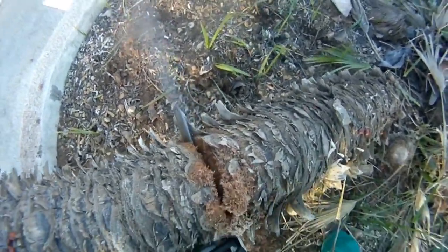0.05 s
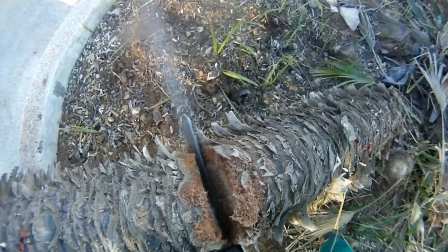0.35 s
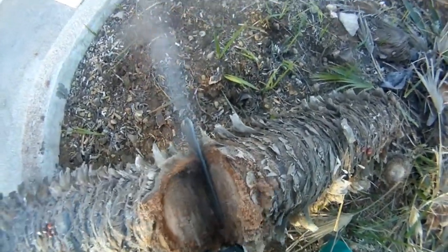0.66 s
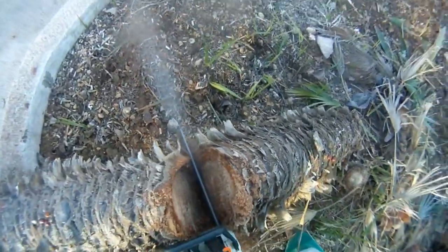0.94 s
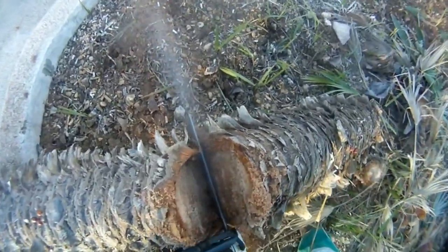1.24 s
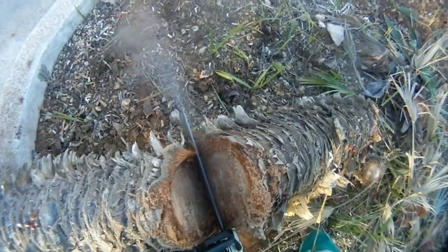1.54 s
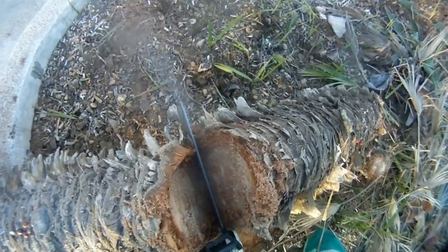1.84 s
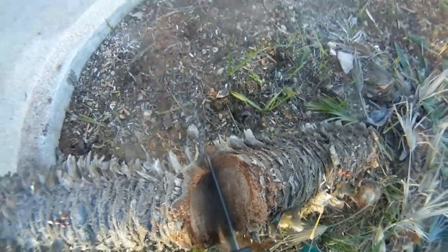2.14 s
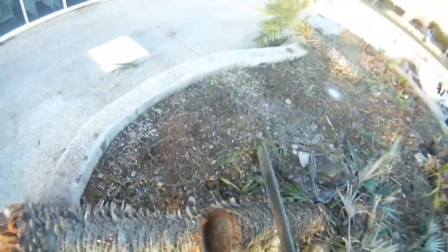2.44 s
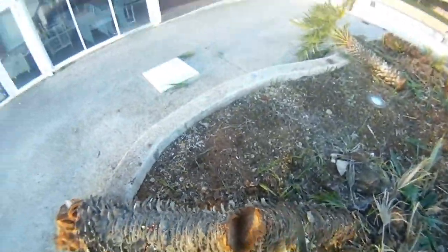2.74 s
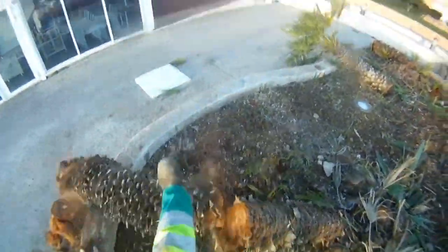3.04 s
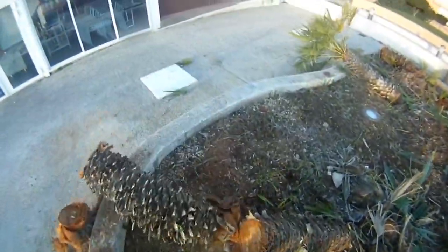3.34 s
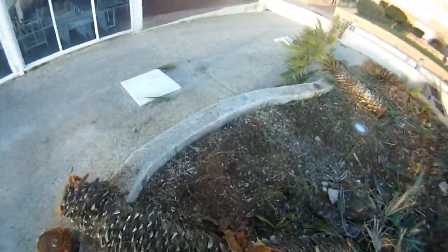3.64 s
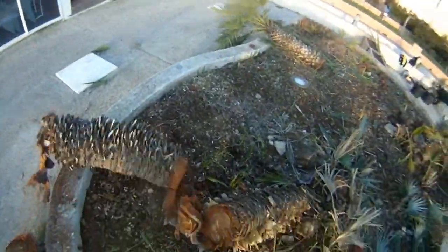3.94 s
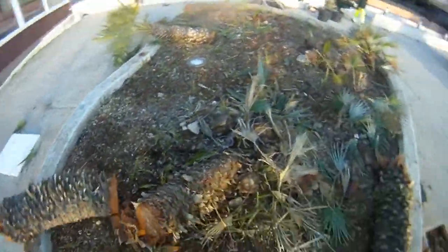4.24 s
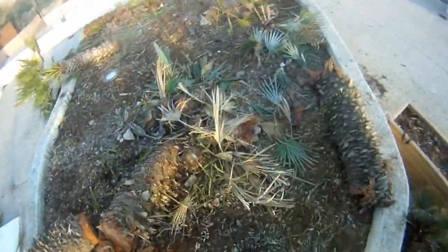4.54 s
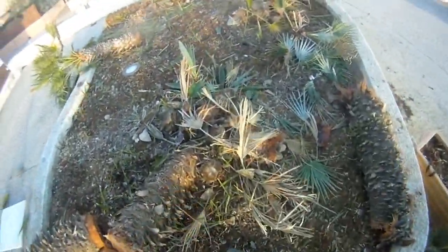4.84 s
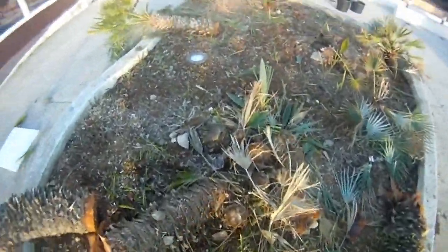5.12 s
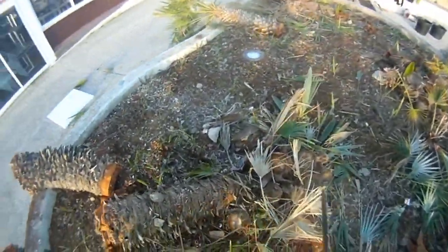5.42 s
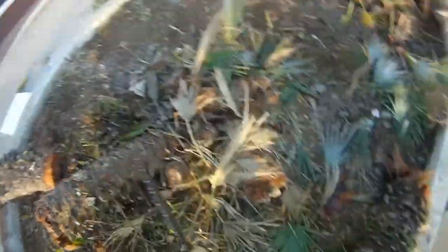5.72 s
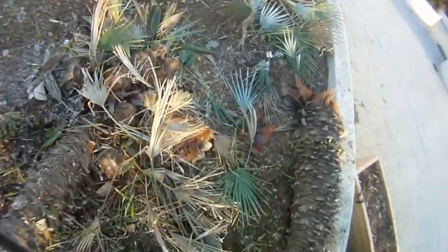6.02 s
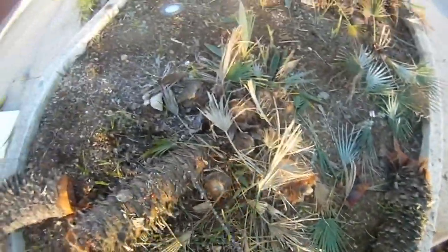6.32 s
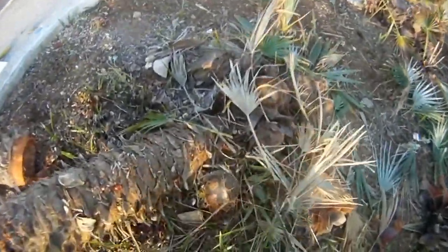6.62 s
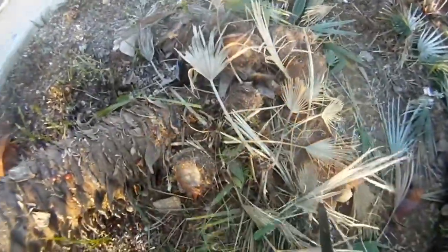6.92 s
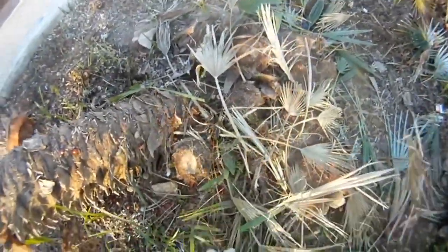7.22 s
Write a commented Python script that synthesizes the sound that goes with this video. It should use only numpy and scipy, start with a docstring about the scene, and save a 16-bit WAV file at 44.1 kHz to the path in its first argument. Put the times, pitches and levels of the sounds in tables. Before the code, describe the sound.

A chainsaw labours through a palm trunk, bogs down, then drops to an uneven idle as the cut log thumps softly.

```python
"""A two-stroke chainsaw, heard from a camera on its user, labours through a fibrous palm trunk, bogs down
and is let off. It runs down to a hunting idle, at times firing raggedly, while the cut log is kicked
away and rolls on the soil. Periodic firing excites the muffler at harmonics of the crankshaft speed;
piston, chain and cutters add noise by impact and friction. Air rumbles faintly."""
import sys
import numpy as np
from scipy import signal
from scipy.fft import rfft, irfft
from scipy.io import wavfile
from scipy.ndimage import uniform_filter1d

SR = 44100
rng = np.random.default_rng(int(sys.argv[2]) if len(sys.argv) > 2 else 0)


def pcm_store(signal):
    """Save signal as 16-bit PCM."""
    levels = np.round(np.clip(np.atleast_2d(signal), -1, 1) * 32767)
    wavfile.write(sys.argv[1], SR, levels.astype(np.int16).T)


N = 325017
TIME = np.arange(N) / SR
FULL_HZ, IDLE_HZ = 180, 45  # reference crankshaft speeds
THROTTLE_OFF_S, RUN_DOWN_S = 2.135, .165
FLAT = [(1000, 0)]  # uniform response: frequency_hz, gain_db

# crankshaft speed in the cut and at idle: time_s, speed_hz
CUT_SPEED = [(0.0, 177.8), (0.13, 174.1), (0.37, 192.4), (0.54, 189.3), (0.86, 200.1), (0.96, 196.4),
             (1.06, 198), (1.13, 188.6), (1.25, 185.2), (1.33, 175), (1.45, 150.4), (1.67, 155.6),
             (1.9, 147.9), (2.03, 132.7), (2.09, 135.3), (2.13, 144.2)]
IDLE_SPEED = [(2.7, 51.6), (3.02, 38.05), (3.49, 46.16), (3.62, 51.65), (3.78, 53.63), (4.21, 53.3),
              (4.52, 44.14), (4.72, 51.1), (5.07, 58.7), (5.38, 59.1), (5.74, 46.4), (5.93, 48.78),
              (6.32, 41.66), (6.76, 49.7), (7.02, 41.1), (7.37, 45.2)]
def crankshaft():
    """Rotational inertia: off the throttle, the speed relaxes exponentially to the hunting idle."""
    cut = np.interp(TIME, *np.transpose(CUT_SPEED))
    idle = np.interp(TIME, *np.transpose(IDLE_SPEED))
    return idle + (cut - idle) * np.exp(-np.maximum(TIME - THROTTLE_OFF_S, 0) / RUN_DOWN_S)

# exhaust harmonics at FULL_HZ: order, relative_db, growth_db_per_octave
FIRING = [(1, 2, 1.5), (2, 4, 25), (3, 1.5, 2.5), (4, -1.5, 3), (5, -8, -2.5), (6, -3.5, 0), (7, -7, -5.5)]
# muffler resonances and hollows under load: centre_hz, width_hz, gain_db
PIPE = [(400, 10, 3.5), (582, 240, 2.5), (592.2, 11.4, -10.5), (764.3, 18.4, -29), (1180, 25, 11.5),
        (1430, 230, -10)]
def loaded_exhaust(turns, octaves):
    """Source and filter: firing harmonics slide across the muffler's fixed resonances."""
    orders = [(k, db + growth_db * octaves) for k, db, growth_db in FIRING]
    return undb(-27) * colour(tones(turns, orders, flutter_db=.5), FLAT, PIPE)

# sprocket harmonics: order, relative_db
SPROCKET = [(6, -5), (9, 1.5), (12, -.5), (15, -9), (18, -19), (21, -16.5)]
# resonances and a hollow of the sprocket cover: centre_hz, width_hz, gain_db
COVER = [(1300, 200, 7), (1417, 110, -12), (1600, 130, 5), (2090, 50, 5.5), (2298, 260, 6),
         (2730, 105, 9.5), (3674, 130, 11)]
# the sprocket's whine swells briefly: start_s, length_s, rise_db
SQUEALS = [(-.1, 0.478, 6), (.42, 0.26, 1.5), (.84, .14, 5.5), (1.21, .19, 4), (1.85, .2, 0.5)]
def sprocket_whine(turns):
    """Resonance: each sprocket harmonic flares as it crosses a mode of the cover."""
    whine = colour(tones(turns + .0046 * walk(45.1), SPROCKET, flutter_db=3), FLAT, COVER)
    return undb(-27.5 + spells(SQUEALS, edge_s=.057)) * whine

# drive links meeting the sprocket: order, relative_db
MESH = [(5, 3), (6, 2), (8, -2.5), (10, 0.5), (11, -1.5), (13, 3.5), (15, 1), (16, -1.5), (18, 6.5),
        (21, -16)]
# resonances and hollows of the guide bar: centre_hz, width_hz, gain_db
BAR = [(1180, 210, 1), (1606, 150, 9), (2460, 89, -5.5), (2725, 37, 7), (3410, 420, -25), (3500, 180, -9)]
# peaks and hollows of the camera's microphone, on saw and bark alike: centre_hz, width_hz, gain_db
MIC_COLOUR = [(1244, 155, 5.5), (1414, 239, -14), (2327, 230, 3.5), (3300, 203, -13.5), (3690, 140, 3),
              (4287, 1190, -9.5), (5300, 340, 2), (5640, 150, 2.5), (5970, 650, -6)]
# spectra of the loaded machine and of the chain sliding in its groove: frequency_hz, gain_db
LOADED = [(100, -33), (400, -21), (700, -23), (1100, -5.5), (1700, 0.5), (2800, -5.5), (4200, -7.5),
          (6000, -16.5)]
SLIDE = [(300, -17.5), (1000, 2), (3000, 11), (4500, 6), (6000, 2.5)]
# the cutters bite into the trunk: start_s, length_s, rise_db
BITES = [(.36, .58, 11), (.94, 0.26, 6.5), (1.18, 0.17, 11), (1.37, 0.84, 9)]
def cutting(turns, octaves):
    """Forced vibration: chain links drive the bar, while the piston knocks and cutters tear fibre."""
    snatching_turns = turns + .008 * walk(59.8)
    whine = colour(tones(snatching_turns, MESH, flutter_db=4), FLAT, BAR)
    knock = colour(ring(pulses(turns, scatter_db=2), decay_s=.0056), LOADED, MIC_COLOUR)
    links = 3 * turns
    tearing = colour(rattle(links, depth=.087, grain_db=.5), LOADED, MIC_COLOUR)
    rasp = colour(rattle(turns, depth=.023, grain_db=.5), SLIDE, MIC_COLOUR)
    clatter = undb(-5) * whine + undb(-1.5) * knock + undb(-2 + .27 * walk(15)) * tearing
    rasp_db = -33.5 + spells(BITES, edge_s=.16) + walk(21.863)
    return undb(-22 + 2.5 * octaves) * clatter + undb(rasp_db) * rasp

# exhaust harmonics at idle: order, relative_db
PUTTER = [(2, -15), (3, -13.5), (4, -1), (5, -4), (6, -27), (7, -8), (8, -9), (9, -12.5), (11, -14)]
# muffler resonances and a hollow at idle: centre_hz, width_hz, gain_db
BOOM = [(167, 50, -2), (237, 120, 6.5), (470, 192, 4)]
# muffler's noise spectrum at idle: frequency_hz, gain_db
MUFFLER = [(60, -35), (130, -14.5), (225, 2.5), (330, -1.5), (480, -12), (1200, -30.5), (4000, -78)]
# ragged firing: start_s, length_s, putter_rise_db, burble_rise_db
RAGGED = [(2.0, 0.44, 5, 2), (2.2, 0.65, 4, 7.5), (5.55, 1, 7.5, 12), (6.68, 0.35, 7, 5)]
def idle_exhaust(turns, octaves):
    """Acoustic filtering: the muffler shapes uneven firing into a tonal putter and a noisy burble."""
    putter_db, burble_db = spells(RAGGED, edge_s=.34) + 4.5 * octaves
    putter = colour(tones(turns + .011 * walk(25), PUTTER, flutter_db=1.5), FLAT, BOOM)
    burble = colour(rattle(turns, depth=.24, grain_db=1), MUFFLER)
    return undb(-54 + putter_db) * putter + undb(-60 + burble_db) * burble

# spectrum of the idling machine: frequency_hz, gain_db
COASTING = [(100, -19.5), (700, -13.5), (1100, -10.5), (1900, 0.5), (2800, -11), (4200, -13), (6000, -26.5)]
# modes of the loose clutch and chain: centre_hz, width_hz, gain_db
CLUTCH = [(1294, 86, 7), (2010, 94, 2.5), (3510, 93, 3.5), (4930, 200, 7)]
# the clutch catches; the chain creeps round the bar: start_s, length_s, rise_db
CATCHES = [(5.22, 0.37, 1.5), (5.9, .22, 2), (6.36, .24, 6.5), (6.78, .42, 6.5)]
CREEPS = [(2.05, 0.75, 16), (5.36, 1.08, 14), (6.62, 0.31, 14), (7.22, .3, 15.5)]
def clutch_and_chain(turns, octaves):
    """Impact and friction: the loose clutch rattles and the sliding chain hisses."""
    bells = list(MIC_COLOUR) + list(CLUTCH)
    clutch = colour(rattle(turns, depth=.15, grain_db=1) * undb(.97 * walk(28)), COASTING, bells)
    chain = colour(rattle(turns, depth=.047, grain_db=2), SLIDE, bells)
    clutch_db = -44 + spells(CATCHES, edge_s=.15) + 10 * octaves
    chain_db = -59.5 + spells(CREEPS, edge_s=.26) + 8 * octaves
    return undb(clutch_db) * clutch + undb(chain_db) * chain

# the shaking reaches the camera more strongly: start_s, length_s, rise_db
SHAKES = [(3.7, 0.58, 6), (4.6, 0.75, 8)]
def shake(turns, octaves):
    """Vibration transmission: the idling saw shakes the camera once a turn."""
    return undb(-56 + spells(SHAKES, edge_s=.13) + 5 * octaves) * unit(np.sin(2 * np.pi * turns))

# bark and dry fibre crunching: start_s, level_db, centre_hz, span_s
CRUNCHES = [(2.21, -29, 1956, .03), (2.622, -32, 1678, 0.014), (2.959, -35.5, 1970, 0.014),
            (3.014, -39, 1231, 0.023), (3.099, -38, 1220, 0.022), (3.661, -50, 3580, 0.016),
            (5.88, -44, 3005, 0.11), (6.757, -42.5, 2424, .025)]
# thumps of boot, log and handling: start_s, level_db, pitch_hz, decay_s
THUMPS = [(2.968, -26, 32.4, 0.047), (3.039, -32, 44.7, 0.033), (3.661, -28.5, 36, 0.035),
          (3.82, -35, 45.4, .06), (6.03, -46.5, 38.3, 0.026), (6.805, -33, 39.6, 0.025)]
def log_moving():
    """Transient excitation: crushed fibres give noise bursts, heavy blows give damped sinusoids."""
    out = np.zeros(N)
    for start_s, db, hz, span_s in CRUNCHES:
        age = 2 * np.maximum(TIME - start_s, 0) / span_s  # the burst peaks at age 1
        spectrum = [(hz / 4, -24), (hz, 0), (hz * .92, -1), (hz * 2.1, -14), (hz * 6, -25)]
        fibres = colour(rng.standard_normal(N) * undb(1.35 * walk(700)), spectrum, MIC_COLOUR)
        out += undb(db) * fibres * age * np.exp(1 - age)
    for start_s, db, hz, decay_s in THUMPS:
        age_s = np.maximum(TIME - start_s, 0)
        out += undb(db) * np.sin(2 * np.pi * hz * age_s) * np.exp(-age_s / decay_s)
    return out

def breeze():
    """Turbulence: moving air makes a low, wavering rumble on the camera."""
    spectrum = [(8, .5), (25, 4), (50, 6), (90, -16), (2000, -96)]
    return undb(-53.5 + 3.1 * walk(9.2)) * colour(rng.standard_normal(N), spectrum)

def tones(turns, orders, flutter_db):
    """Harmonic series: partials locked to the crankshaft, each fluttering on its own."""
    return unit(sum(undb(db + flutter_db * walk(12)) * np.sin(2 * np.pi * (k * turns + rng.random()))
                    for k, db in orders))

def pulses(turns, scatter_db):
    """Impulse train: a click of random size each turn, with equal power at any speed."""
    at = np.flatnonzero(np.diff(np.floor(turns)) > 0)
    step = turns[at + 1] - turns[at]
    early = turns[at + 1] % 1 / step  # share of the click in the earlier sample
    size = undb(scatter_db * rng.standard_normal(len(at))) / np.sqrt(step)
    out = np.zeros(N)
    out[at] += size * early
    out[at + 1] += size * (1 - early)
    return unit(out)

def rattle(turns, depth, grain_db):
    """Amplitude modulation: grainy noise swells once a cycle."""
    swell = np.exp(depth * np.cos(2 * np.pi * turns))
    return unit(rng.standard_normal(N) * swell * undb(grain_db * walk(900)))

def ring(x, decay_s, size=2048):
    """Modal overlap: countless small casing modes smear each blow into decaying noise."""
    return signal.oaconvolve(x, rng.standard_normal(size) * np.exp(-TIME[:size] / decay_s))[:N]

def colour(x, points, bells=(), size=8192):
    """Minimum-phase filtering: a broad spectrum with bell-shaped peaks and hollows; unit RMS out."""
    f = np.maximum(np.fft.rfftfreq(size, 1 / SR), 1)
    hz, db = np.transpose(points)
    db = np.interp(np.log(f), np.log(hz), db)
    for centre, width, gain in bells:
        db = db + gain * .5 ** ((2 * (f - centre) / width) ** 2)
    cepstrum = irfft(np.log(undb(db)))
    cepstrum[1:size // 2] *= 2
    cepstrum[size // 2 + 1:] = 0
    response = irfft(np.exp(rfft(cepstrum)))
    return unit(signal.oaconvolve(x, response)[:N])

def spells(table, edge_s):
    """Trapezoidal envelopes: each row's rise fades in, holds and fades out; overlaps add."""
    start, length, *rises = np.transpose(table)
    inside_s = np.minimum(TIME - start[:, None], (start + length)[:, None] - TIME)
    return np.squeeze(np.array(rises) @ np.clip(.5 + inside_s / edge_s, 0, 1))

def walk(rate_hz):
    """Smooth random fluctuation of unit RMS."""
    k = int(SR / rate_hz)
    return unit(uniform_filter1d(np.repeat(rng.standard_normal(N // k + 1), k), k)[:N])

def undb(db):
    return 10 ** (np.asarray(db) / 20)

def unit(x):
    return x / np.sqrt(np.mean(x ** 2))

def scene():
    """Superposition: one crankshaft drives the saw from load to idle, over the log and the breeze."""
    hz = crankshaft()
    turns = np.cumsum(hz) / SR
    load_octaves, idle_octaves = np.log2(hz / FULL_HZ), np.log2(hz / IDLE_HZ)
    throttle = .5 - .5 * np.tanh((TIME - THROTTLE_OFF_S) / .027)
    loaded = loaded_exhaust(turns, load_octaves) + sprocket_whine(turns) + cutting(turns, load_octaves)
    idling = sum(part(turns, idle_octaves) for part in (idle_exhaust, clutch_and_chain, shake))
    saw = throttle * loaded + (1 - throttle) * idling
    # the camera is held stiller while the saw cuts
    return np.tile(saw + log_moving() + undb(-6 * throttle) * breeze(), (2, 1))

HOLD_HZ, TOP_HZ, IMAGE_LAG_S = 12000, 15000, .002
def record(dry):
    """Spectral imaging: a slow sample-and-hold mirrors the sound faintly into the treble, up to TOP_HZ."""
    bins = np.arange(N // 2 + 1)
    period = round(HOLD_HZ * N / SR)
    offset = bins - period * np.round(bins / period).astype(int)
    source = rfft(dry)[:, np.abs(offset)]
    held = np.where(offset < 0, np.conj(source), source) * offset / np.maximum(bins, 1)
    lag_s = IMAGE_LAG_S * (2 * bins // period)  # each image lags the one below it
    mirrored = irfft(held * np.exp(-2j * np.pi * np.fft.rfftfreq(N, 1 / SR) * lag_s), N)
    return signal.sosfilt(signal.ellip(10, .2, 80, TOP_HZ, fs=SR, output="sos"), mirrored)

dry = scene()
out = record(dry)
pcm_store(out)
```